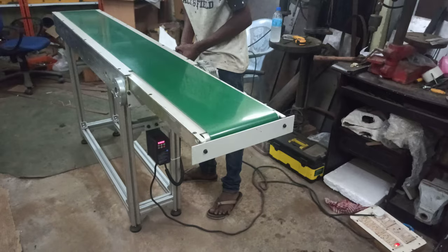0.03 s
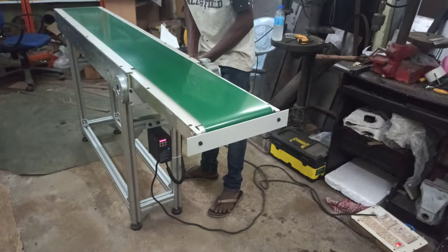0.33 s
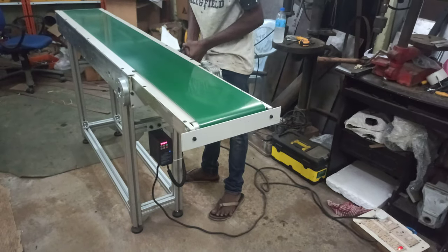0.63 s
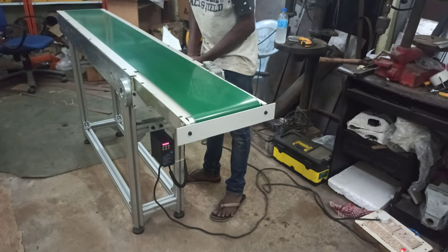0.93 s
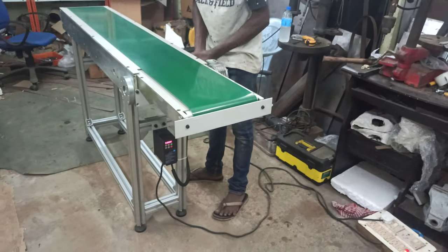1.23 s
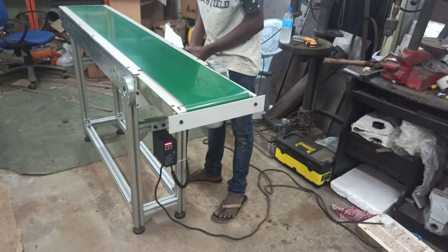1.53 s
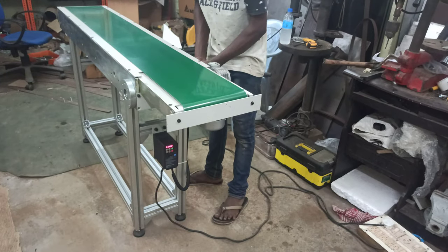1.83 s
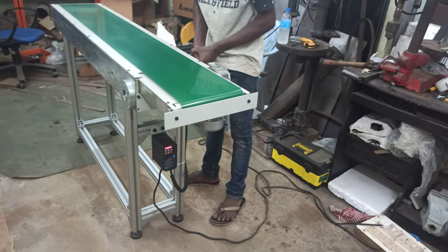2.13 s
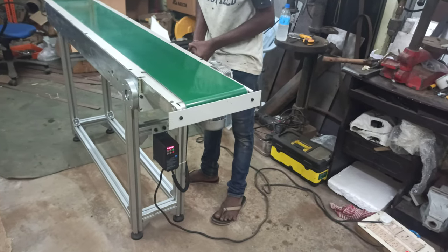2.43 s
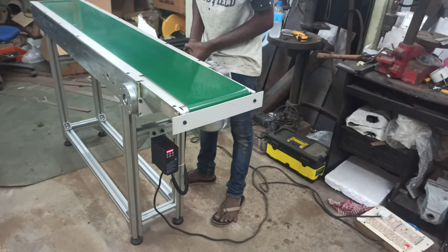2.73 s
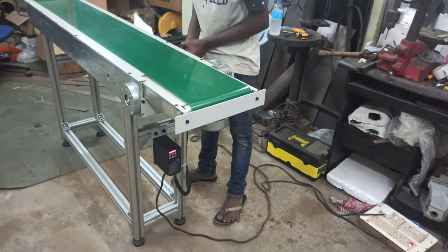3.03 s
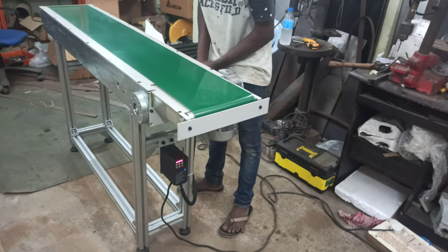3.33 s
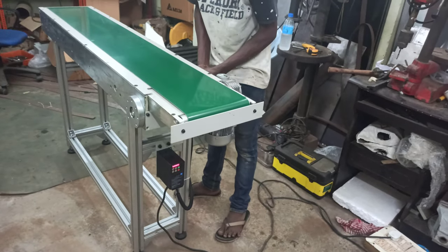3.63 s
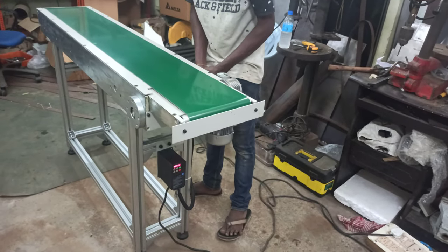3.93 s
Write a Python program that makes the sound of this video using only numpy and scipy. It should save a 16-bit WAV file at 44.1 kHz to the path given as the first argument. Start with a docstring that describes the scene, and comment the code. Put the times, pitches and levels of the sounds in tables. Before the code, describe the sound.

Steady rumble and hiss of a running conveyor belt, with a high whine and faint squeaks.

```python
"""A small belt conveyor runs steadily in a workshop, about two metres from a stereo microphone.
The geared motor rumbles and hums, the belt hisses over its bed, pulsing with the rollers, and the
speed controller makes the windings whine in many steady tones. Now and then the belt scrapes
along the frame, squeaks on a roller or bumps on its bed. The sound fades in at the start."""
import sys
import numpy as np
from scipy import signal
from scipy.fft import rfft, irfft, next_fast_len
from scipy.io import wavfile
from scipy.ndimage import uniform_filter1d, map_coordinates

SR = 44100
rng = np.random.default_rng(int(sys.argv[2]) if len(sys.argv) > 2 else 0)


def put_to_file(sound):
    """Save the sound as 16-bit audio at rate SR, in the file named by the first command-line argument."""
    columns = np.atleast_2d(sound).T  # one column per channel
    safe = np.clip(columns, -1, 1)
    whole_steps = np.round(safe * 32767)
    wavfile.write(sys.argv[1], SR, whole_steps.astype(np.int16))


N = 176400


def motor():
    """The gearbox rumbles, two broad resonances of the frame swell, and shaft and gear teeth hum."""
    # spectra of the gearbox and the two resonances (frequency [Hz], relative level [dB])
    rumble_spectrum = [(20, -38), (45, -31.5), (62, -9), (85, -3), (115, -1.5), (150, -2.5), (230, -2.5),
                       (290, 0), (335, -4), (385, -1), (460, -5.5), (520, -2.5), (720, -6), (900, -8.5),
                       (1100, -11.5), (1500, -13), (2500, -37), (5000, -87)]
    boom_spectrum = [(180, -19), (270, 2), (325, 1.5), (385, 7), (460, -6), (700, -68)]
    growl_spectrum = [(450, -62), (640, 3.5), (790, 7), (900, 8.5), (1100, -11.5), (1600, -63)]
    # swell of the resonances (time [s], boom level [dB], growl level [dB])
    resonance_levels = [(.4, -55, -52), (.9, -51, -50.5), (1.3, -42, -48), (1.7, -50.5, -52),
                        (2.15, -46.5, -53), (2.6, -50.5, -46), (3.0, -48.5, -48.5), (3.45, -42.5, -46),
                        (3.9, -58, -43.5)]
    # tones of motor and gear teeth (frequency [Hz], relative level [dB])
    hum_tones = [(80, -56), (90, -51), (134, -58), (371, -57), (848, -58), (883, -54), (1011, -61)]
    boom_db, growl_db = curves(resonance_levels)
    rumble = amp(-38.5) * rush(rumble_spectrum)
    boom = amp(boom_db) * rush(boom_spectrum, patchy_db=2.5)
    growl = amp(growl_db) * rush(growl_spectrum, patchy_db=1.5)
    hum = sum(amp(db) * tone(hz, wander_hz=1.65, waver_db=-1.5, spread_rad=0.071)
              for hz, db in hum_tones)
    flutter = amp(0.37 * wobble(21.85))
    return flutter * (rumble + boom + growl) + amp(-2) * hum


def belt():
    """The belt slides on its bed with a hiss and a fine fizz; the drag swells with each roller turn."""
    # belt hiss and high fizz, with an empty band from 9 to 11.5 kHz between them
    # (frequency [Hz], relative level [dB])
    hiss_spectrum = [(400, -48), (1000, 3.5), (1500, -0.5), (1900, 3), (2300, -1), (3200, 0), (3850, 3),
                     (4300, -1.5), (4680, -3.5), (4850, -10.5), (6000, -9), (6250, -3), (7550, -1),
                     (7800, -8), (8450, -10), (8800, -30.5), (10000, -99)]
    fizz_spectrum = [(10500, -65), (11400, -60), (11650, 5), (12100, 2), (12300, 10), (12800, 7),
                     (13200, 6.5), (15000, 7.5), (15700, -3)]
    roller_hz, roller_depth_db = 7.7, 0.58
    roller_phase = 2 * np.pi * roller_hz * clock() + wobble(2.32)
    drag_db = roller_depth_db * np.sin(roller_phase) + 0.29 * wobble(13)
    hiss = amp(-39) * rush(hiss_spectrum)
    fizz = amp(-51.5 + 0.8 * wobble(40)) * rush(fizz_spectrum)
    return amp(drag_db) * (hiss + fizz)


def whine():
    """The controller's switching makes the windings sing at its carrier and sidebands."""
    # the four strongest switching tones (frequency [Hz])
    strong_hz = [3700, 3759, 4000, 7459]
    # each swells and fades as the microphone drifts through the room's standing waves
    # (time [s], relative left level [dB], relative right level [dB])
    low_levels = [(0.3, -56, -50), (0.52, -57, -54), (0.82, -58, -49), (1.63, -53, -55), (1.9, -54, -54),
                  (2.03, -55, -45), (2.11, -58, -53), (2.28, -58, -48), (2.45, -58, -55), (2.78, -56, -44),
                  (3.13, -51, -51), (3.95, -60, -55)]
    middle_levels = [(0.3, -49, -54), (0.75, -53, -56), (1.06, -58, -48), (1.46, -51, -51),
                     (1.63, -51, -58), (1.82, -50, -46), (1.98, -57, -44), (2.11, -54, -46),
                     (2.24, -56, -41), (2.45, -50, -42), (2.54, -47, -54), (2.69, -55, -44),
                     (2.89, -50, -61), (3.17, -57, -47), (3.58, -50, -56), (3.95, -58, -45)]
    carrier_levels = [(0.3, -48, -53), (0.45, -48, -44), (0.61, -48, -56), (1.01, -53, -55),
                      (1.14, -51, -44), (1.34, -51, -49), (1.88, -52, -39), (2.46, -53, -55),
                      (2.6, -49, -47), (2.71, -51, -52), (2.81, -47, -43), (2.9, -55, -43),
                      (3.13, -50, -47), (3.38, -51, -45), (3.69, -51, -55), (3.95, -50, -45)]
    whistle_levels = [(0.3, -47, -51), (0.46, -42, -58), (0.66, -48, -60), (0.76, -45, -55),
                      (1.7, -49, -55), (1.89, -40, -57), (2.08, -56, -50), (2.24, -53, -58),
                      (2.46, -46, -55), (2.7, -53, -51), (2.83, -57, -54), (2.93, -48, -53),
                      (3.07, -53, -58), (3.19, -44, -56), (3.53, -52, -55), (3.95, -43, -57)]
    # weaker switching tones (frequency [Hz], relative level [dB], left over right [dB])
    weak_tones = [(1495, -63, 0), (1850, -56, -2), (2050, -58, -6), (2150, -59, -3), (2391, -58, -5),
                  (2691, -63, -1), (3112, -62, -4), (3459, -57, -5), (3659, -54, -8), (4241, -61, -5),
                  (4300, -60, -1), (4541, -58, 0), (4641, -65, 0), (5609, -70, 0), (6391, -62, 3),
                  (6691, -57, 2), (7159, -63, 4), (7241, -63, 4), (8000, -65, 1), (8300, -62, -3),
                  (8341, -64, -3), (12541, -68, 1), (13850, -66, 4), (13950, -69, 5), (14150, -66, 4),
                  (14750, -63, 5), (14900, -69, 3), (15100, -71, 2), (15250, -68, 5)]
    # the whine emerges a little after the noise (time [s], gain [dB])
    entry = [(.1, -8), (.28, 0)]
    weak = sum(amp(db) * pan(balance_db) * tone(hz, wander_hz=0.65, waver_db=-2, spread_rad=1)
               for hz, db, balance_db in weak_tones)
    strong_levels = [low_levels, middle_levels, carrier_levels, whistle_levels]
    strong = sum(amp(curves(levels)) * tone(hz, wander_hz=0.65, waver_db=0, spread_rad=1)
                 for hz, levels in zip(strong_hz, strong_levels))
    entry_db, = curves(entry)
    return amp(entry_db) * (amp(-1.7) * weak + amp(-1.6) * strong)


def scrapes():
    """The belt's edge sticks and slips along the frame, which rings."""
    # contacts (peak time [s], rise [s], fall [s], ring level [dB], rasp level [dB])
    contacts = [(1.092, 0.017, .024, -51, -35.5), (1.995, 0.011, 0.013, -36, -38),
                (2.023, .009, 0.028, -35, -40.5), (3.18, .012, .023, -57, -50)]
    # the ringing frame (frequency [Hz], relative level [dB])
    frame_spectrum = [(700, -31), (1400, -8), (1850, 1.5), (2350, -21), (2900, -4.5), (3400, 2), (3800, -3),
                      (4400, -15), (8000, -43.5)]
    # scraping rasp, with an empty band from 9 to 11.5 kHz (frequency [Hz], relative level [dB])
    rasp_spectrum = [(300, -20), (700, 14), (2000, 0.5), (4300, 3), (5300, -10), (6600, 9.5), (7600, 3),
                     (8500, -5), (9000, -37), (11200, -37), (11900, -5), (15500, -4)]
    roughness_db, slip_hz = 1.3, 369
    ring, rasp = rush(frame_spectrum), rush(rasp_spectrum)
    slips = unit(amp(roughness_db * wobble(slip_hz)))
    return slips * sum(swell(peak_s, rise_s, fall_s) * (amp(ring_db) * ring + amp(rasp_db) * rasp)
                       for peak_s, rise_s, fall_s, ring_db, rasp_db in contacts)


def squeaks():
    """Brief stick-slip tones, some clean and some rough, where the belt grips a roller."""
    # grips (peak time [s], pitch [Hz], pitch jitter [Hz], rise [s], level [dB])
    grips = [(.45, 900, 45.4, .012, -40), (1.242, 1560, 39, .012, -42), (1.255, 1440, 25, 0.017, -43),
             (1.395, 1447, 14, 0.0049, -37.5), (1.73, 1026, 74, 0.017, -39.5), (1.86, 1420, 25, 0.011, -44),
             (1.988, 1822, 8.1, .028, -39), (2.65, 830, 40, 0.031, -41), (2.96, 830, 40, .01, -37),
             (3.44, 853, 40, 0.022, -36)]
    slip_hz = 166.8
    sound = np.zeros((2, N))
    for peak_s, hz, jitter_hz, rise_s, db in grips:
        phase = 2 * np.pi * np.cumsum(hz + jitter_hz * wobble(slip_hz)) / SR
        channel_phase = rng.normal(0, 0.61, (2, 1))
        sound += amp(db) * swell(peak_s, rise_s, fall_s=0.022) * np.sin(phase + channel_phase)
    return sound


def bumps():
    """The belt slaps softly on its hollow bed."""
    # slaps (peak time [s], level [dB])
    slaps = [(.62, -40), (.655, -48), (.77, -44), (.975, -46.5), (1.15, -44), (1.235, -41), (1.42, -36.5),
             (2.06, -38.5), (2.14, -47), (2.29, -41.5), (2.35, -39.5), (2.66, -40.5), (3.44, -39.5)]
    # spectrum of the bed (frequency [Hz], relative level [dB])
    bed_spectrum = [(120, -30), (280, -2), (350, 5), (470, -20), (750, -5), (1150, -20), (1480, -12.5),
                    (2100, -31), (5000, -102)]
    envelope = sum(amp(db) * swell(peak_s, rise_s=0.011, fall_s=0.023) for peak_s, db in slaps)
    return envelope * rush(bed_spectrum, patchy_db=1.5)


def rush(spectrum, patchy_db=1):
    """Stereo noise of rms 1 as the room spreads it, with patches of random gain."""
    # stereo width at the microphone (frequency [Hz], side over mid [dB])
    width = [(60, -18), (150, -16), (350, -13.5), (700, -8.5), (1300, -.5), (2500, 1), (14000, 1)]
    # balance at the microphone (frequency [Hz], left over right [dB])
    balance = [(90, 3), (150, 0), (1200, 0), (2300, -2.5), (3300, -2.5), (3900, -10.5), (4500, 4.5),
               (5900, -4.5), (6400, 6.5), (7550, 7.5), (8300, -2), (12000, 1.5), (14000, 4)]
    bins = signal.stft(rng.standard_normal((2, N)), nperseg=512)[2]
    patches = uniform_filter1d(rng.standard_normal(bins.shape[1:]), size=4, axis=0)  # across frequency
    patches = uniform_filter1d(patches, size=10, axis=1)  # across time
    noise = signal.istft(bins * amp(patchy_db * unit(patches)), nperseg=512)[1][:, :N]
    mid, side = filtered(noise, lambda hz: amp([along(spectrum, hz),
                                                along(spectrum, hz) + along(width, hz)]))
    left_right = np.array([mid + side, mid - side])
    return unit(filtered(left_right, lambda hz: pan(along(balance, hz))))


def tone(hz, wander_hz, waver_db, spread_rad):
    """A steady tone of rms 1 whose pitch wanders and whose level and phase waver in each channel."""
    phase = 2 * np.pi * (np.cumsum(hz + wander_hz * wobble(7.95)) / SR + rng.random())
    channels = [amp(waver_db * wobble(3.98)) * np.sin(phase + spread_rad * wobble(2.09))
                for _ in range(2)]
    return unit(np.array(channels))


def swell(peak_s, rise_s, fall_s):
    """A rounded rise to a peak, then a decay in the room."""
    t = clock() - peak_s
    rise = np.exp(-(np.minimum(t, 0) / rise_s) ** 2 / 2)
    decay = np.exp(1 - np.hypot(1, np.maximum(t, 0) / fall_s))
    return rise * decay


def wobble(rate_hz):
    """A smooth random curve through rate_hz knots a second."""
    knots = rng.standard_normal(N // 64)
    return map_coordinates(knots, [clock()[::16] * rate_hz + 2], mode="wrap").repeat(16)[:N]


def amp(db):
    """Decibels to gain."""
    return 10 ** (np.asarray(db) / 20)


def unit(x):
    """Scale to rms 1."""
    return x / np.sqrt(np.mean(x ** 2) + 1e-20)


def clock():
    """Time of every sample in seconds."""
    return np.arange(N) / SR


def along(points, hz):
    """Interpolate (frequency, value) points on a log frequency axis."""
    point_hz, values = np.transpose(points)
    return np.interp(np.log(hz + 1), np.log(point_hz + 1), values)


def curves(rows):
    """One value per sample for each column after the time."""
    times, *columns = np.transpose(rows)
    return [np.interp(clock(), times, column) for column in columns]


def filtered(x, response):
    """Filter x by a response given as a function of frequency."""
    size = next_fast_len(N + SR // 2)
    return irfft(rfft(x, size) * response(np.fft.rfftfreq(size, 1 / SR)), size)[..., :N]


def pan(db):
    """Left and right gains of constant power for a level difference."""
    gains = amp(np.array([np.atleast_1d(db), -np.atleast_1d(db)]) / 2)
    return gains / np.sqrt(np.mean(gains ** 2, axis=0))


def scene():
    """The conveyor stands a little to the right: its low sounds reach the right channel first."""
    left_lag_s, corner_hz = 0.00017, 1500  # the lag shrinks above the corner

    def arrival(hz):
        return np.exp(1j * np.pi * left_lag_s * np.array([-hz, hz]) / np.hypot(1, hz / corner_hz))

    body = filtered(motor() + bumps() + squeaks(), arrival)
    return body + whine() + belt() + scrapes()


def record(dry):
    """The recorder fades in and keeps nothing above its band limit."""
    # fade-in (time [s], gain [dB])
    fade_in = [(.074, -74), (.079, -21.5), (.125, -12.5), (.15, -8), (.22, -4), (.3, -0.5), (.38, 1)]
    band_limit_hz = 15760
    fade_db, = curves(fade_in)
    return filtered(dry * amp(fade_db), lambda hz: hz < band_limit_hz)


dry = scene()
out = record(dry)
put_to_file(out)
```